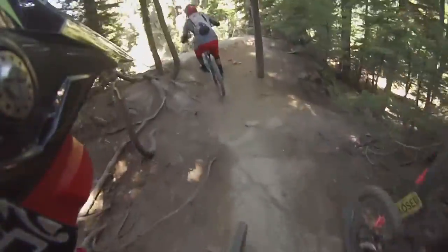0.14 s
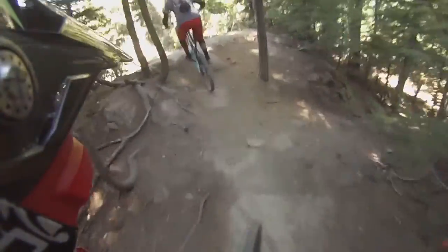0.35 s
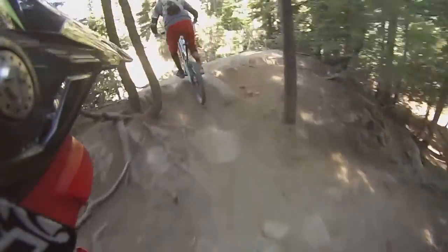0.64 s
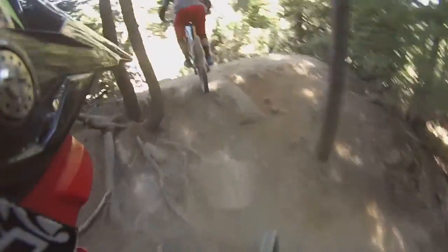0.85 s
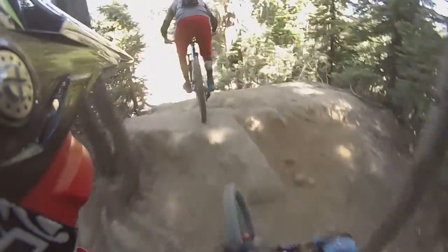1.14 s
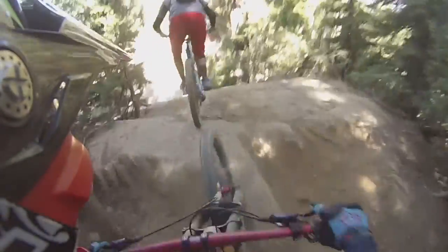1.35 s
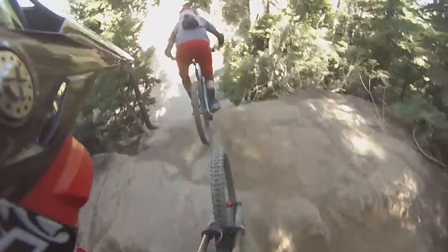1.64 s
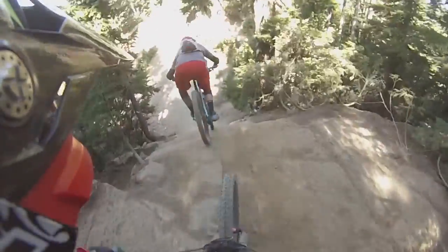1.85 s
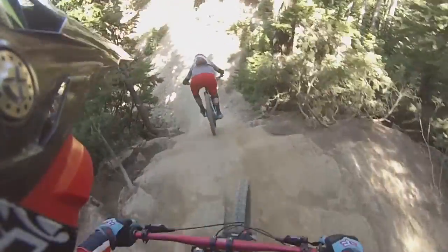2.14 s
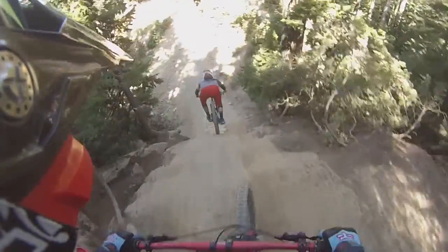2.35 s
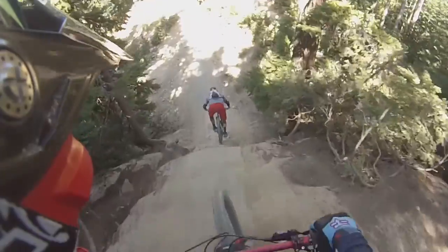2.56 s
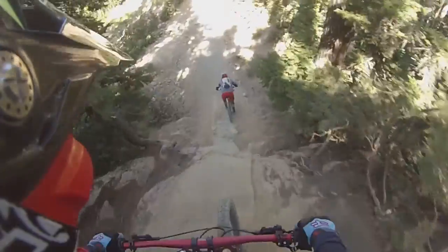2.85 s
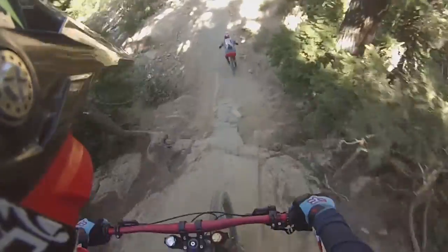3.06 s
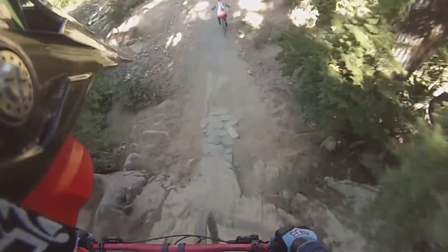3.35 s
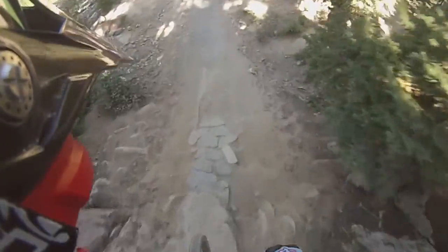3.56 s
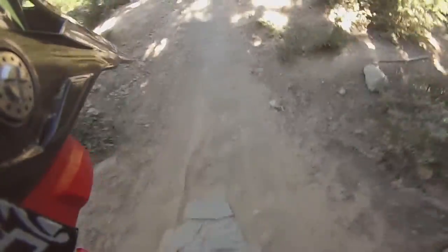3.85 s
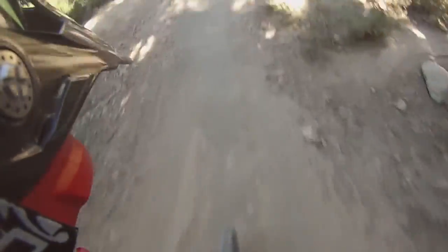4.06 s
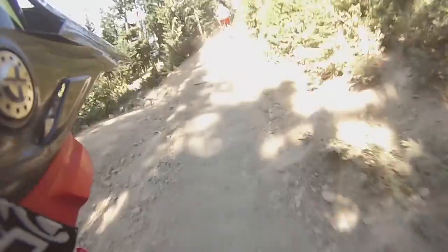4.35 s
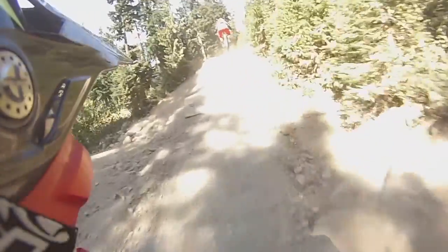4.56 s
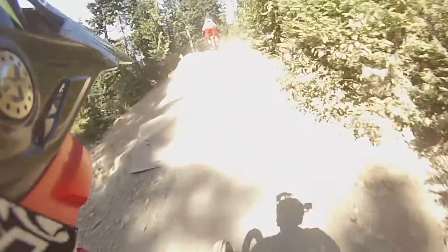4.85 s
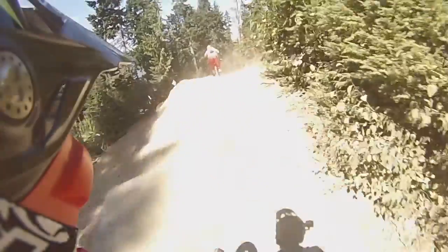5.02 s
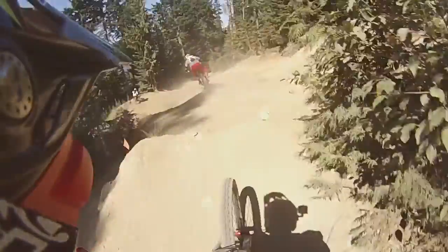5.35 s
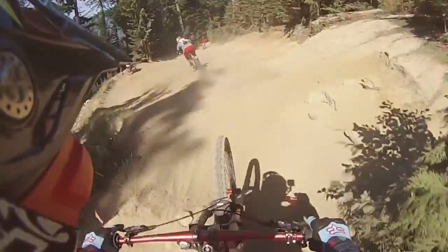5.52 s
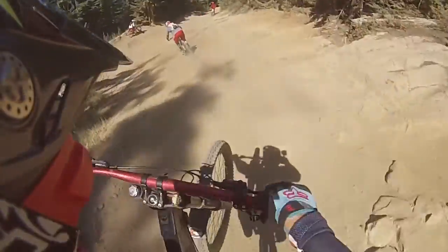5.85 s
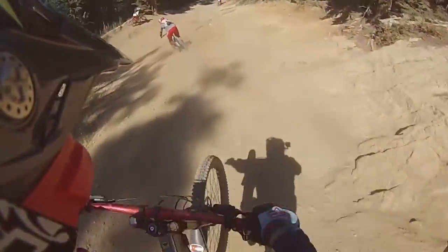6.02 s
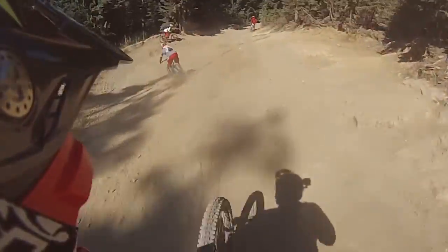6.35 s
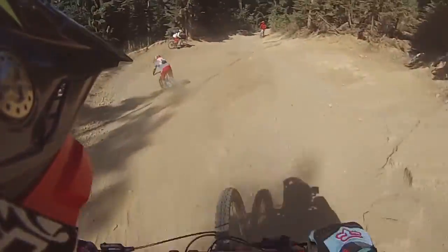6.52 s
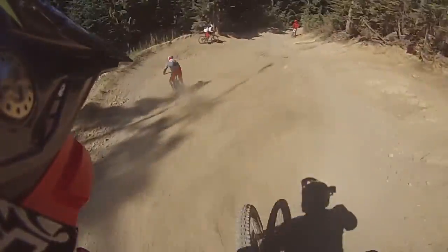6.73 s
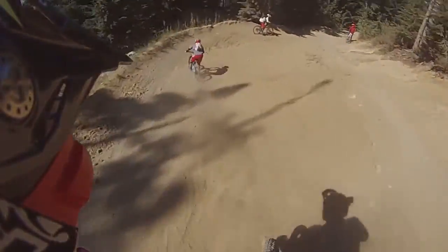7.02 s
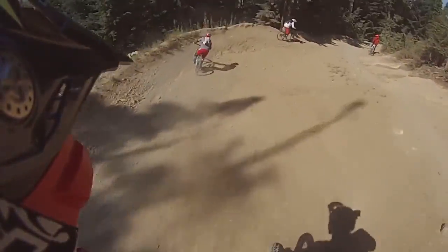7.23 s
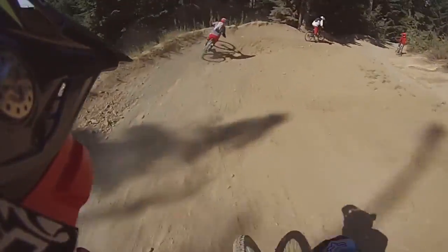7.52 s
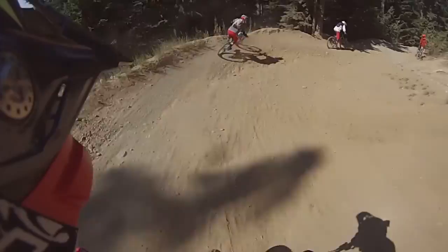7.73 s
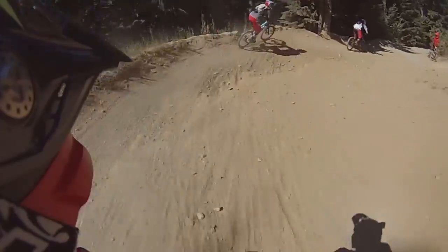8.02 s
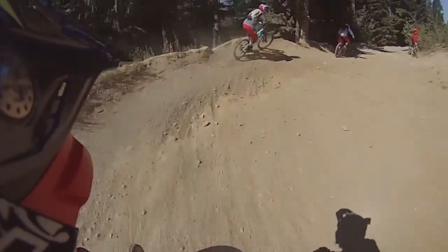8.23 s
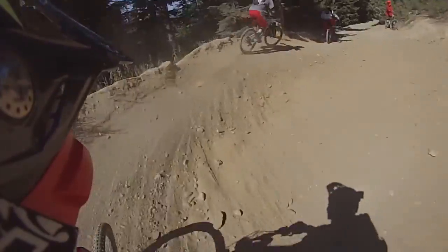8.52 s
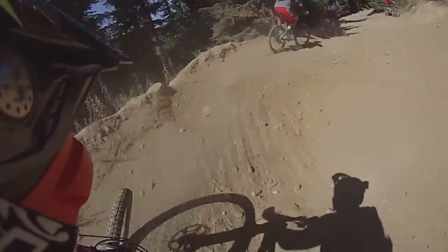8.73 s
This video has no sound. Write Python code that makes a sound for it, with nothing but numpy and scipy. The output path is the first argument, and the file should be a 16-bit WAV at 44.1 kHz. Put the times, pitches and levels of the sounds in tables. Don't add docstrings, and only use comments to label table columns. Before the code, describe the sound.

A dry, close and boxy outdoor sound: low wind and ground rumble against a sealed camera case, a deep flutter from its springy mount, and tyres crunching grit. Light taps and thin metal ticks pepper the quieter opening. Two rapid landings at about four seconds bring cracks, booms and clattering parts, then skids, a brief lull, another slap and rough closing bumps.

```python
import sys
import numpy as np
from scipy import signal
from scipy.fft import rfft, irfft
from scipy.io import wavfile
from scipy.ndimage import uniform_filter1d

SR = 44100
rng = np.random.default_rng(int(sys.argv[2]) if len(sys.argv) > 2 else 0)


def magnitude_from_level(level_db):
    exponent = np.asarray(level_db, float) / 20
    return 10 ** exponent


def wrap_up_sound(samples):
    columns = np.atleast_2d(samples).T
    tamed = np.clip(columns, -1, 1)
    steps = np.round(tamed * 32767).astype(np.int16)
    wavfile.write(sys.argv[1], SR, steps)


N = 391608

# time_s, tyre_crunch_db, mount_shake_db, wind_on_case_db
TRAIL = [(0.0, -59.5, -38, -59), (1.2, -60.5, -31, -56.5), (1.48, -61.5, -39, -60),
         (2.5, -62, -43.5, -58.5), (2.79, -53.5, -35.5, -57.5), (3.55, -57, -41, -53.5),
         (3.84, -49, -32.5, -49), (4.06, -44.5, -18.5, -43), (4.3, -47.5, -19, -45),
         (4.67, -45.5, -35.5, -42), (5.38, -51, -29, -46.5), (5.87, -60.5, -47, -57.5),
         (6.15, -55.5, -45, -51), (6.5, -53.5, -39.5, -51), (7.3, -54.5, -36, -51), (7.68, -49, -26, -47),
         (8.2, -48.5, -20.5, -45.5), (8.88, -55.5, -45.5, -54.5)]
MID_LOAD_DB = -53


def evened(x):
    return x / np.sqrt(np.mean(x ** 2) + 1e-20)


def curves(rows):
    s, *columns = np.transpose(rows)
    return [np.interp(np.arange(N) / SR, s, c) for c in columns]


def add(mix, s, sound):
    part = mix[round(s * SR):][:len(sound)]
    part += sound[:len(part)]


def struck(x, db):
    return magnitude_from_level(db) * x / abs(x).max()


def flicker(per_s):
    span = max(int(SR / per_s), 1)
    return evened(uniform_filter1d(uniform_filter1d(rng.standard_normal(N), span), span))


def grit(per_s, spread_db, size=N):
    hit = rng.random(size) < per_s / SR
    sign = rng.choice([-1., 1.], size)
    return evened(hit * sign * magnitude_from_level(spread_db * np.minimum(rng.exponential(1, size), 4)))


def humped(floor_db, rows):
    fall_db, roundness = 9, 1.16
    t, power = np.arange(N) / SR, magnitude_from_level(floor_db) ** 2
    for s, db, length in rows:
        near = slice(max(int((s - 3 * length) * SR), 0), int((s + 3 * length) * SR))
        away = abs(2 * (t[near] - s) / length)
        power[near] += magnitude_from_level(db - fall_db * away ** roundness) ** 2
    return np.sqrt(power)


def coloured(x, points):
    f, db = np.transpose(points)
    hz = np.fft.rfftfreq(len(x), 1 / SR)
    gain = magnitude_from_level(np.interp(np.log(hz + 1), np.log(f + 1), db))
    return evened(irfft(rfft(x) * gain, len(x)))


def resonate(x, hz, width):
    r = np.exp(-np.pi * width / SR)
    if np.isscalar(hz):
        return signal.lfilter([1 - r], [1, -r * np.exp(2j * np.pi * hz / SR)], x + 1e-18)
    turn = np.exp(2j * np.pi * np.cumsum(hz) / SR)
    return turn * signal.lfilter([1 - r], [1, -r], x / turn + 1e-18)


def twice(x, hz, width):
    return evened(resonate(resonate(x, hz, width).real, hz, width).real)


def ringing(x, modes):
    return evened(sum((-1) ** k * magnitude_from_level(db) * resonate(x, hz, width).real
                      for k, (hz, width, db) in enumerate(modes)))


def rocking():
    # pitch_hz, level_db_per_hz
    mount_spectrum = [(8, -28.5), (16, 1.5), (26, -3.5), (40, -1), (50, -5), (58, -11), (68, -33),
                      (100, -65)]
    # centre_s, peak_db, length_s
    bumps = [(0.315, -32, 0.024), (0.655, -26.5, 0.042), (0.977, -21, 0.078), (1.242, -32.5, 0.055),
             (1.349, -26, 0.09), (0.897, -27, 0.041), (2.468, -34, 0.049), (1.76, -30.5, 0.17),
             (2.179, -28.5, 0.027), (2.698, -35, 0.15), (3.25, -29.5, 0.048), (3.493, -28.5, 0.12),
             (3.693, -26, 0.078), (3.887, -18.5, 0.049), (4.269, -15.5, 0.039), (4.404, -17.5, 0.089),
             (4.547, -14.5, 0.017), (4.616, -21, 0.032), (4.75, -16.5, 0.08), (4.934, -15, 0.085),
             (5.125, -17.5, 0.11), (5.352, -24, 0.2), (6.336, -16.5, 0.056), (6.54, -30.5, 0.33),
             (6.972, -26, 0.021), (7.129, -26, 0.033), (7.435, -25, 0.18), (7.666, -23.5, 0.08),
             (7.917, -13, 0.021), (8.164, -8, 0.092), (8.521, -22.5, 0.1), (8.659, -20.5, 0.13),
             (8.786, -15.5, 0.041), (0.01, -24, 0.046), (3.869, -22.5, 0.074), (4.044, -11.5, 0.044),
             (4.142, -11.5, 0.029), (4.328, -14.5, .05), (5.477, -35, .08), (7.564, -25, 0.081),
             (8.026, -17, 0.091), (8.266, -23, 0.04)]
    shake = humped(curves(TRAIL)[1] - 1.5 + 2.2 * flicker(20), bumps)
    swing = coloured(rng.standard_normal(N), mount_spectrum)
    swing = evened(swing / uniform_filter1d(abs(signal.hilbert(swing)), 1200) ** 0.52) * shake
    deep = [(10, -3), (22, 0), (50, -2.5), (62, -23), (85, -32), (150, -72)]
    swing = coloured(swing, deep) * np.std(swing) * magnitude_from_level(2.5)
    swing = swing - free_swings()
    travel = uniform_filter1d(abs(signal.hilbert(swing)), 500) / 0.72
    shell = twice(rng.standard_normal(N), 80, 39)
    shell = evened(shell / uniform_filter1d(abs(shell), 1500) ** 0.52)
    shudder = magnitude_from_level(-38.5) * travel ** 0.97 * shell
    return shudder - swing / np.maximum(travel, 1)


def free_swings():
    # start_s, peak_db, pitch_hz, t60_s
    landings = [
        (3.931, -1.5, 35.9, 0.29),
        (4.1896, 0, 38.9, 0.12),
        (6.367, -6.5, 36.4, 0.14),
    ]
    out, t = np.zeros(N), np.arange(SR // 2) / SR
    rise = 1 - np.exp(-(t / 0.011) ** 2)
    for s, db, hz, t60 in landings:
        add(out, s, struck(np.sin(2 * np.pi * hz * t) * rise * magnitude_from_level(-60 * t / t60), db))
    return out


def tyres(chatter_db):
    # pitch_hz, width_hz, level_db
    case_modes = [(674, 310, -8), (1550, 113, 2.5), (2076, 214, -1.5), (2506, 330, -5.5), (3170, 1600, -24)]
    # pitch_hz, width_hz, level_db
    tyre_modes = [(1327, 220, 1), (1633, 225, 1), (1894, 370, -2.5), (2406, 250, -2), (3170, 550, -13.5)]
    # centre_s, peak_db, length_s
    skids = [(4.66, -44, 0.14), (5.52, -62, 0.14), (6.08, -54, .1), (6.31, -45.5, 0.13),
             (6.866, -59, 0.092), (7.413, -52, 0.16), (8.035, -52.5, 0.19), (7.67, -51, 0.12),
             (8.308, -63, .15), (3.44, -54, 0.14), (4.97, -50, .08)]
    crunch_db = curves(TRAIL)[0]
    load_db = 0.36 * (crunch_db - MID_LOAD_DB)
    flex = 1 + 0.017 * flicker(14)
    patch_db = 1.6 * flicker(40)
    casing = []
    for k, (hz, width, db) in enumerate(tyre_modes):
        casing.append((hz * np.roll(flex, k * SR), width, db + np.roll(patch_db, k * SR)))
    buzz = ringing(0.58 * grit(1500, 4.1) + 0.72 * rng.standard_normal(N), case_modes)
    buzz = buzz * magnitude_from_level(-3 + 2.8 * flicker(26))
    roar = ringing(0.54 * grit(1500, 5) + 0.77 * rng.standard_normal(N), casing)
    roar = roar * magnitude_from_level(load_db + 0.5 * flicker(70))
    dulled = [(100, 0), (3500, -2), (7000, -5.5), (12000, -20)]
    crunch = coloured(buzz + roar + magnitude_from_level(-10.5) * flecks(), dulled)
    return humped(crunch_db, skids) * magnitude_from_level(chatter_db) * crunch


def flecks():
    # pitch_hz, width_hz, level_db
    loose_parts = [(1250, 71, -5.5), (1603, 32, 3.5), (2140, 64, 1), (2464, 30, -14.5), (3495, 30, -6),
                   (5000, 54, -6), (6740, 69, -12), (8050, 150, -17.5)]
    return evened(sum(magnitude_from_level(db) * evened(resonate(grit(60, 2.6), hz, width).real)
                      for hz, width, db in loose_parts))


def knocks():
    # pitch_hz, width_hz, level_db
    frame_modes = [(740, 89, 1), (1105, 102, 0.5), (1494, 97, 5.5), (2084, 600, 0.5), (2210, 343, 5)]
    # start_s, peak_db, pitch_hz, thud_db, pure_ring_share (0-1)
    hard_knocks = [(0.16, -31, 780, -7, 0.26), (0.771, -36.5, 1210, -7, 0.73),
                   (0.782, -32.5, 2220, -18, 0.2), (0.917, -40, 1230, -25, 0.5),
                   (1.77, -43, 1140, -0.5, 0.54), (2.379, -47.5, 1620, 5, 0.3),
                   (2.751, -36, 2200, -3, 0.66), (2.76, -30.5, 1600, -13, 0.7),
                   (3.451, -33.5, 2260, -5, 0.2), (3.608, -40, 520, 0, .6), (3.926, -16, 1860, -15, 0.68),
                   (3.927, -25.5, 2370, -1, 0.5), (3.931, -16, 1350, -13, 0.6), (3.98, -26, 1550, -12, 0.7),
                   (4.206, -36, 1100, -3, 0.2), (4.218, -34.5, 1090, -9, 0.5), (4.271, -34, 2580, -8, .3),
                   (5.099, -30, 755, -18, 0.43), (5.231, -29.5, 1340, -0.5, 0.4),
                   (5.391, -36, 740, -9, 0.46), (5.747, -39.5, 1380, -14, 0.3),
                   (6.2837, -24, 1600, -11, 0.34), (6.3654, -31, 1155, -1, 0.9),
                   (6.368, -38, 1700, -15, .95), (6.374, -38, 780, -13, 0.6),
                   (7.143, -38.5, 1030, -17, 0.3), (6.259, -37, 1520, -25, 1),
                   (8.383, -34.5, 1250, -10, 0.5)]
    # start_s, peak_db, pitch_hz
    light_taps = [(0.289, -45.5, 1450), (0.86, -47, 1550), (.875, -48, 1450), (1.105, -50, 1250),
                  (1.12, -46, 1550), (1.139, -44, 1590), (1.175, -41.5, 1540), (1.251, -46, 1600),
                  (1.265, -42.5, 1580), (1.286, -46, 1490), (2.664, -43, 1520), (2.707, -42, 1510),
                  (2.772, -37, 1520), (2.926, -44, 1630), (3.028, -50, 1410), (3.111, -41, 1550),
                  (3.274, -51, 1180), (3.51, -44, 880), (2.975, -47, 750), (3.504, -41, 1450),
                  (3.591, -36, 1590), (3.817, -39.5, 1440), (4.028, -33, 1320), (4.933, -34, 1240),
                  (5.05, -36, 1550), (5.161, -38, 1260), (5.207, -42, 1130), (5.256, -39, 1430),
                  (5.346, -37, 1330), (6.839, -41, 1310), (6.949, -40, 1720), (7.802, -45, 1510),
                  (7.88, -39, 1570), (8.105, -30.5, 1560), (8.21, -46, 1570), (8.625, -39, 1250),
                  (8.679, -47, 1510), (8.741, -48, 1480), (8.705, -40.5, 1290)]
    tap_thud_db, tap_pure = -11.5, 0.71
    out, t = np.zeros(N), np.arange(4000) / SR
    for s, db, hz, thud_db, pure in hard_knocks + [(*row, tap_thud_db, tap_pure) for row in light_taps]:
        noise = rng.standard_normal((2, len(t)))
        snap = 5 * (t == t[40])
        crack = (noise[0] + snap) * magnitude_from_level(-60 * t / 0.019) * np.minimum(t / 0.0012, 1)
        body = (1 - pure) * ringing(crack, frame_modes) + pure * twice(crack, hz, 275)
        thud = twice(noise[1] * magnitude_from_level(-60 * t / 0.017), 270, 1200)
        add(out, s, struck(body, db) + struck(thud, db + thud_db))
    return out


def slams():
    # start_s, peak_db, push_s, boom_share (0-1), clack_share (0-1)
    hard_landings = [
        (3.927, -14, 0.0012, 0.9, 0.19),
        (4.204, -15.5, 0.0034, 0.08, 0.02),
        (6.369, -19.5, 0.0003, 0.94, 0.17),
    ]
    out, t = np.zeros(N), np.arange(6000) / SR
    boom = np.sin(2 * np.pi * 143 * t) * magnitude_from_level(-60 * t / 0.063)
    clack = np.sin(2 * np.pi * 790 * t) * magnitude_from_level(-60 * t / 0.075)
    for s, db, length, boom_share, clack_share in hard_landings:
        push = (1 - t / length) * np.exp(-t / length) * np.minimum(t / 0.00084, 1)
        add(out, s, struck(push + boom_share * boom + clack_share * clack, db))
    return out


def thumps():
    # start_s, peak_db, pitch_hz, t60_s
    soft_blows = [(1.015, -54, 600, 0.036), (1.205, -47, 277, .05), (1.207, -52, 684, .04),
                  (1.285, -51, 276, 0.041), (1.287, -53, 560, 0.044), (2.14, -56, 600, 0.035),
                  (2.95, -53, 486, .05), (3.617, -41, 170, .08), (3.766, -40.5, 160, .07),
                  (3.855, -29, 170, 0.13), (3.893, -26.5, 208, 0.055), (3.929, -33, 602, 0.054),
                  (4.2054, -26, 300, 0.017), (4.2053, -26.5, 563, .012), (4.219, -39, 780, .05),
                  (6.259, -39, 1520, .07), (6.37, -43, 1150, .04), (3.932, -28, 1140, .03),
                  (5.232, -37, 1100, .02), (5.048, -51, 564, .04), (5.097, -40.5, 275, 0.058),
                  (5.151, -41.5, 332, .05), (5.231, -34, 552, 0.028), (5.237, -37.5, 280, 0.047),
                  (5.256, -43, 730, .035), (5.28, -41, 403, .04), (5.296, -37, 300, 0.043),
                  (5.366, -49, 800, .025), (5.389, -46, 756, .04), (6.367, -34, 560, 0.021),
                  (6.368, -36, 258, 0.048), (7.43, -44, 151, .1), (8.49, -44, 130, 0.12)]
    out, t = np.zeros(N), np.arange(5000) / SR
    for s, db, hz, t60 in soft_blows:
        sag = 1 - 0.06 * np.minimum(t / t60, 1)
        ring = np.sin(2 * np.pi * hz * t * sag) * magnitude_from_level(-60 * t / t60) * (1 - np.exp(-t / 0.00079))
        add(out, s, struck(ring, db))
    return out


def scuffs():
    # start_s, length_s, level_db, pitch_hz, width_hz
    rattles = [(1.11, 0.2, -60.5, 2000, 740), (1.17, 0.07, -57, 1580, 400),
               (2.137, 0.046, -52.5, 1550, 160), (4.56, 0.22, -62.5, 3500, 2000),
               (4.7, 0.18, -62, 2100, 400), (6.03, .15, -58.5, 2200, 570), (4.09, 0.047, -45, 1600, 150),
               (2.394, 0.081, -57.5, 1510, 220), (2.75, 0.06, -53, 3500, 3600), (3.2, .03, -61, 1590, 200),
               (3.975, 0.073, -54, 6000, 5900), (4.87, 0.07, -65, 4400, 300),
               (5.084, 0.055, -50.5, 2500, 7200), (4.3, 0.032, -51, 4500, 6800),
               (6.286, 0.04, -55, 3500, 3000), (6.478, 0.042, -58, 7000, 700),
               (3.8, 0.63, -60.5, 4500, 3500), (6.268, 0.015, -45, 2300, 2100),
               (5.25, 0.36, -62.5, 5600, 4600), (5.85, .35, -73, 5000, 65), (5.85, 0.32, -73, 6500, 80),
               (5.8, .45, -70, 8100, 250), (5.1, 0.75, -69, 8100, 550), (5.09, .05, -56.5, 7400, 1800),
               (4.03, .15, -62, 6200, 600), (7.38, 0.12, -55, 2200, 1600), (8.8, 0.25, -81, 3000, 2700),
               (3.8, .03, -53, 6900, 1400), (4.285, .02, -56, 7300, 2000), (4.53, 0.29, -51.5, 2390, 350),
               (4.7, 0.12, -49, 1550, 400), (3.978, 0.04, -45, 1800, 900), (3.85, .05, -46, 1530, 220),
               (4.15, 0.05, -46, 1350, 180), (4.8, .04, -54, 3000, 1200), (3.8, 0.055, -52, 1640, 200),
               (5.229, 0.0122, -47.5, 2300, 2000), (4.28, .03, -48, 1480, 200)]
    out = np.zeros(N)
    for s, length, db, hz, width in rattles:
        size = int(length * SR)
        hits = grit(760, 3, size=size) + 1.15 * rng.standard_normal(size)
        u = np.linspace(0, 1, size)
        swell = np.minimum(u / 0.14, 1) * (1 - u) ** 0.62 * 1.18
        add(out, s, magnitude_from_level(db) * twice(hits, hz, width) * swell)
    return out


def ticks():
    # start_s, peak_db, pitch_hz, broad_click_share (0-1)
    metal_taps = [(0.2593, -47, 6800, 0.5), (1.7695, -51, 5770, 0.3), (1.8065, -44.5, 6860, 0.7),
                  (2.101, -47, 6800, 0.5), (2.151, -49, 6920, 0.65), (2.431, -43, 6820, 0.6),
                  (2.7516, -41, 4040, 0.5), (4.2743, -52, 10400, .1), (3.1353, -48, 4790, 0.6),
                  (3.2745, -45.5, 5900, 0.4), (3.3039, -54, 6400, .45), (3.6591, -52, 5920, 0.2),
                  (3.8148, -42, 3800, 0.6), (3.8676, -50, 6900, .05), (3.929, -35, 4070, 0.3),
                  (4.0327, -49, 5170, 0.5), (4.0607, -40, 7740, 0.46), (4.0884, -45, 6900, 0.47),
                  (4.2043, -55, 4800, .45), (4.214, -42, 5000, 0.4), (4.272, -33, 4350, 1),
                  (4.319, -50, 7000, 0.2), (4.579, -46, 4250, .2), (4.768, -50, 4870, 0.3),
                  (4.9028, -46, 5030, 0.6), (5.229, -43, 5940, 0.8), (5.847, -48, 5500, 0.7),
                  (6.9007, -52, 6910, .45), (7.1442, -44.5, 6140, 0.4), (7.941, -46, 6740, 0.3),
                  (.57, -53, 3640, .3), (2.8315, -48, 3580, .3), (2.943, -51, 3990, .3),
                  (3.411, -55, 3550, .3), (4.875, -54, 7000, .3), (5.602, -50, 5500, .6),
                  (5.7483, -56, 6160, .4), (6.08, -57, 6900, .1), (6.137, -55, 5200, .5),
                  (6.172, -63, 5500, .2), (6.269, -38, 3400, 0.34), (6.27, -39, 2600, .1),
                  (6.4847, -44, 5000, .9), (7.22, -57, 4770, .1), (7.2634, -53, 5640, .3)]
    out, t = np.zeros(N), np.arange(2500) / SR
    for s, db, hz, broad in metal_taps:
        tap = rng.standard_normal(len(t)) * magnitude_from_level(-60 * t / 0.024) * np.minimum(t / 0.00084, 1)
        ring = (1 - broad) * twice(tap, hz, 830)
        click = broad * twice(tap, 3760, 5600)
        add(out, s, struck(ring + click, db))
    return out


def rumble(chatter_db):
    # pitch_hz, level_db_per_hz
    rumble_spectrum = [(35, -54), (60, -9), (81, -19), (113, -16), (222, -22.5), (258, -21), (319, -28),
                       (418, -29.5), (1000, -37.5), (1300, -42), (2200, -120)]
    # centre_s, peak_db, length_s
    jolts = [(0.01, -57, 0.043), (0.963, -54, 0.06), (1.35, -55, 0.071), (2.168, -59, .05),
             (3.621, -44, 0.043), (3.87, -41, 0.09), (3.937, -29, 0.031), (4.14, -50, .04),
             (4.206, -34, .03), (4.302, -55, 0.032), (6.09, -51.5, 0.17), (6.365, -39, 0.066),
             (6.953, -63, 0.041), (0.776, -50.5, 0.061), (1.21, -50, .03), (1.748, -56, .08),
             (3.787, -49, .05), (3.904, -48, .03), (4.028, -42.5, .04), (6.07, -52, 0.087),
             (6.196, -60, .08), (2.76, -50, 0.036), (7.448, -51, 0.16), (8.398, -47.5, 0.082),
             (8.55, -46.5, 0.15), (8.7, -48, .1)]
    wind_db = curves(TRAIL)[2]
    lumps_db = 0.71 * chatter_db + 1.07 * flicker(24)
    air = coloured(rng.standard_normal(N), rumble_spectrum)
    deep = signal.lfilter(*signal.butter(2, 230, fs=SR), air)
    air = air + deep * (magnitude_from_level(0.35 * (wind_db + 48.5) + 1.1 * chatter_db) - 1)
    return humped(wind_db, jolts) * magnitude_from_level(lumps_db) * air


def dust(chatter_db):
    # pitch_hz, level_db_per_hz
    dust_spectrum = [(2000, -10), (3000, 0), (5000, -2.5), (7000, -13), (9000, -19), (12000, -39)]
    load_db = curves(TRAIL)[0] - MID_LOAD_DB
    dust_db = -68 + 0.45 * load_db + 1.3 * flicker(11) + 1.4 * chatter_db
    return magnitude_from_level(dust_db) * coloured(0.5 * grit(2500, 5.7) + 0.67 * rng.standard_normal(N), dust_spectrum)


def hiss():
    # pitch_hz, level_db_per_hz
    hiss_spectrum = [(1650, 0), (2800, -1), (3800, -5), (4160, -4.5), (5890, -7.5), (6650, -4),
                     (7420, -9.5), (8030, -7.5), (8690, -12.5), (11200, -13), (12000, -20), (15600, -56),
                     (22000, -120)]
    return magnitude_from_level(-62.5 + 0.88 * flicker(22)) * coloured(rng.standard_normal(N), hiss_spectrum)


def scene():
    chatter_db = 0.8 * flicker(26)
    steady = rocking() + tyres(chatter_db) + rumble(chatter_db) + dust(chatter_db) + hiss()
    hits = knocks() + slams() + thumps() + scuffs()
    dulled = signal.lfilter(*signal.butter(2, 7200, fs=SR), hits)
    return (steady + dulled + ticks())[None]


def top_cut(x):
    return signal.sosfilt(signal.butter(12, 12480, fs=SR, output="sos"), x)


def record(dry):
    edge = signal.firwin(255, 12350, window=("kaiser", 8), fs=SR)
    mix = signal.oaconvolve(dry, edge[None], "same")
    return top_cut(mix)


dry = scene()
out = record(dry)
wrap_up_sound(out)
```